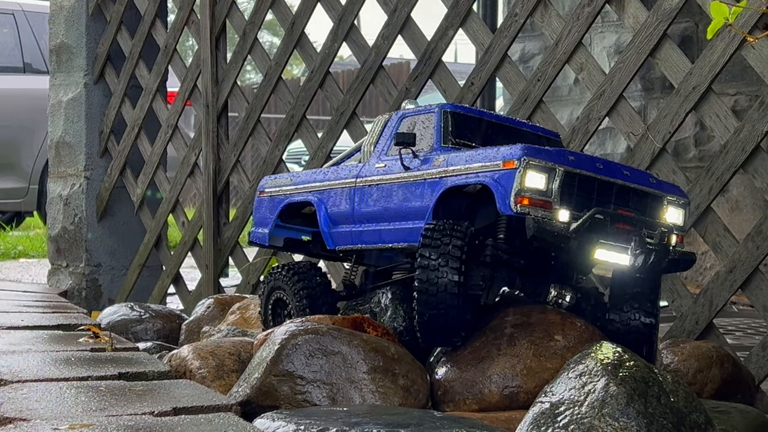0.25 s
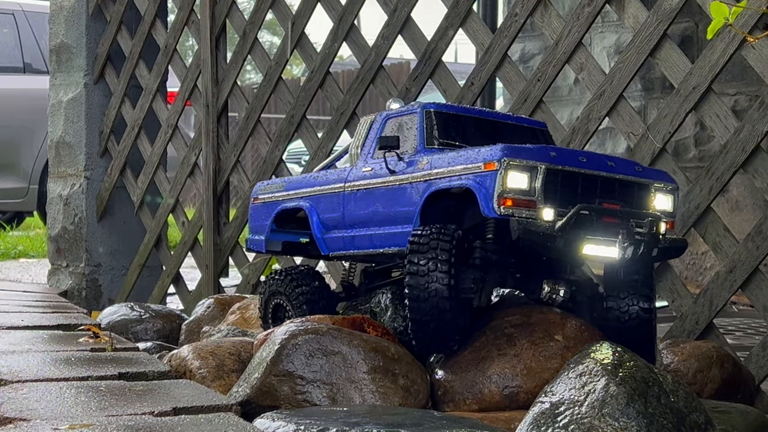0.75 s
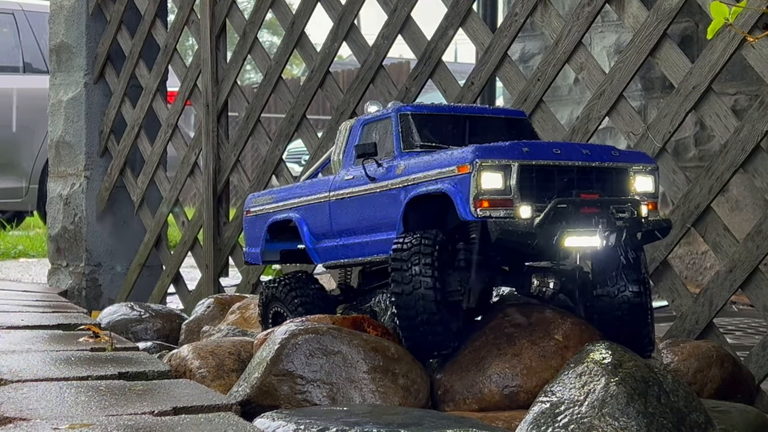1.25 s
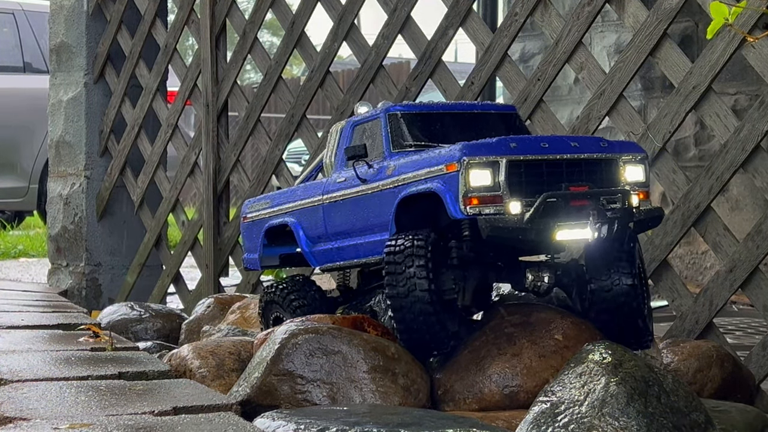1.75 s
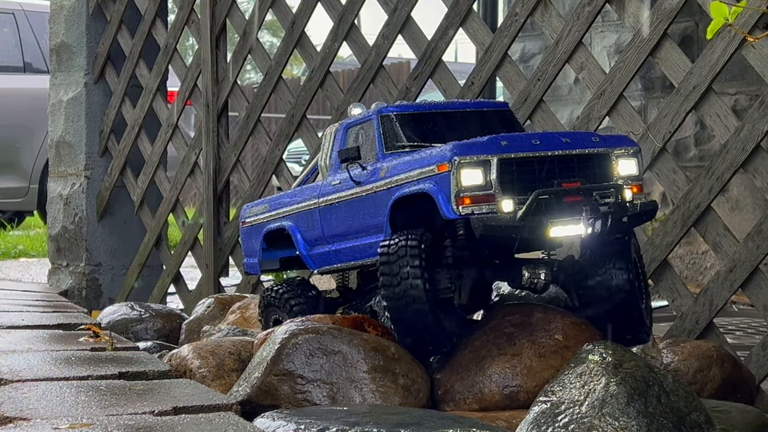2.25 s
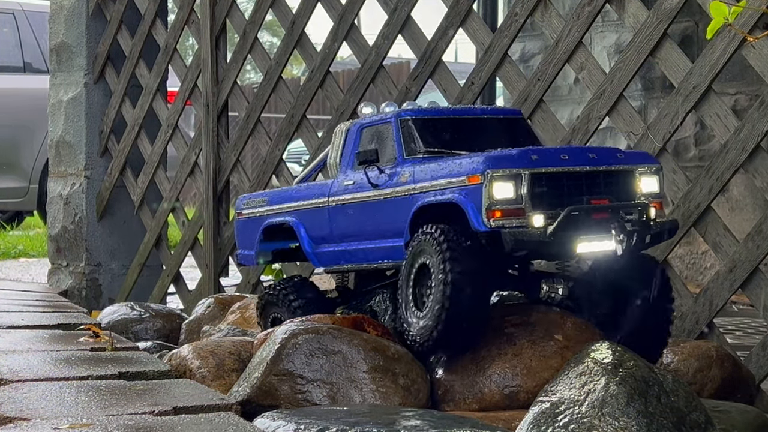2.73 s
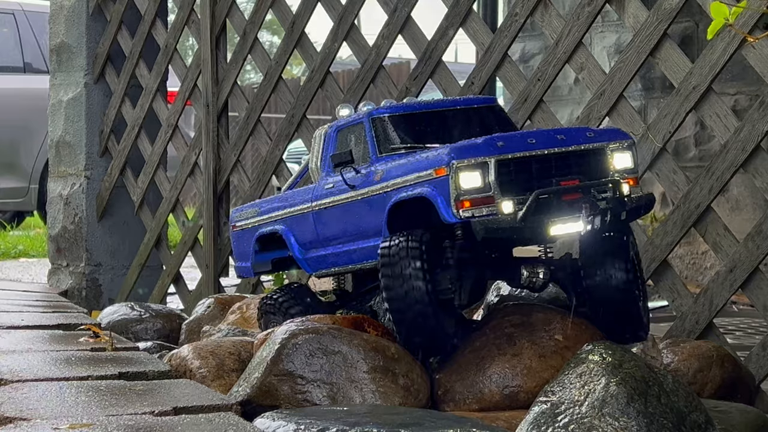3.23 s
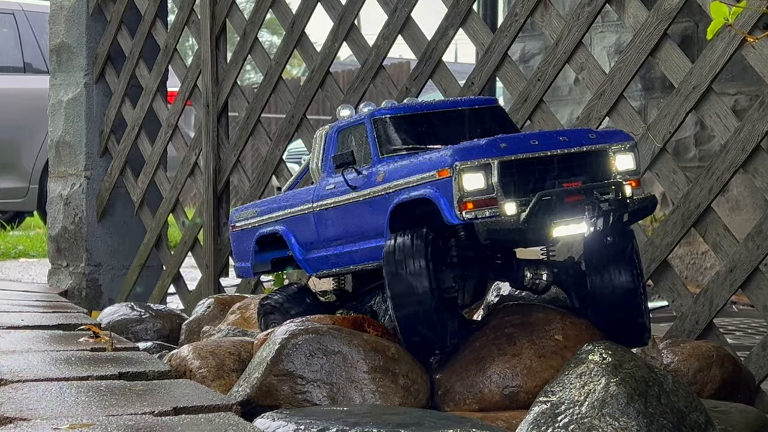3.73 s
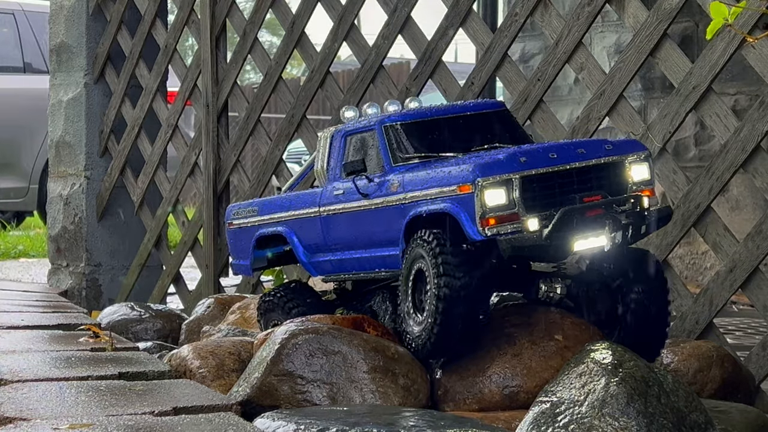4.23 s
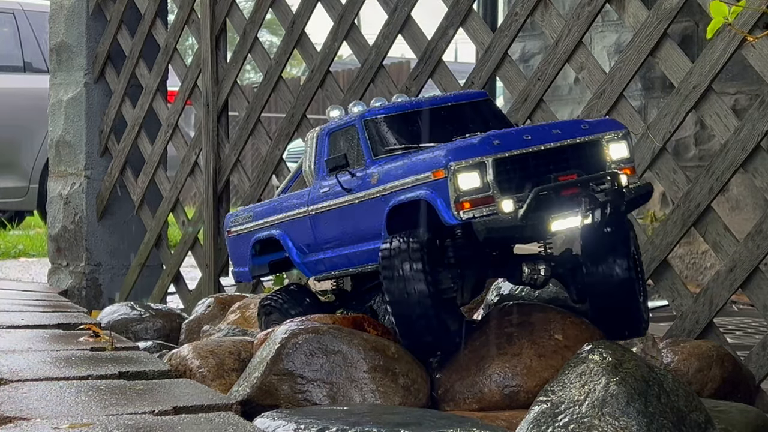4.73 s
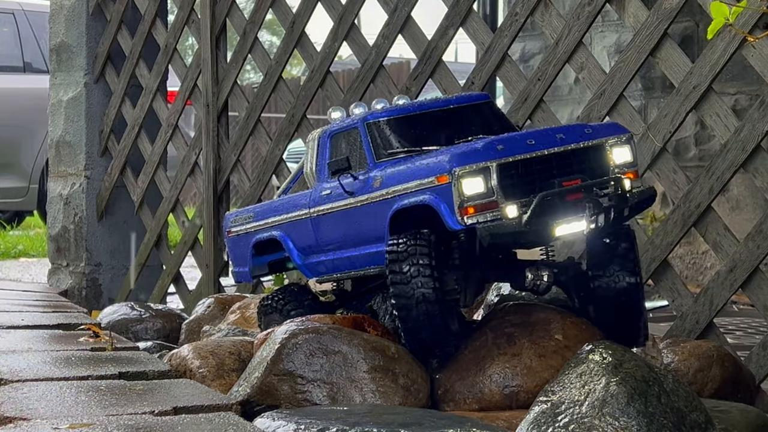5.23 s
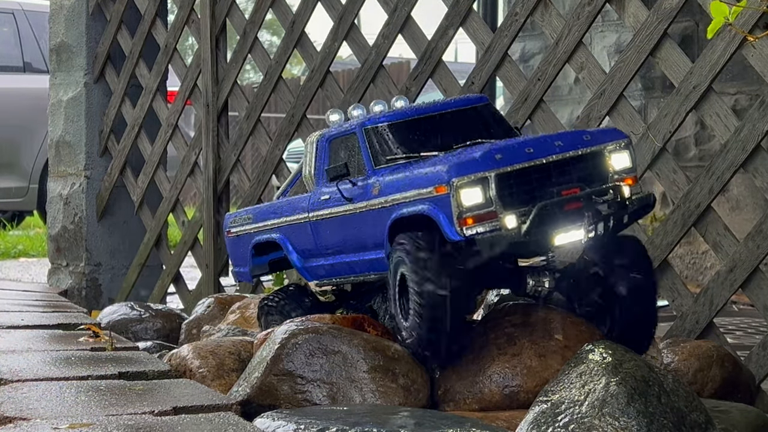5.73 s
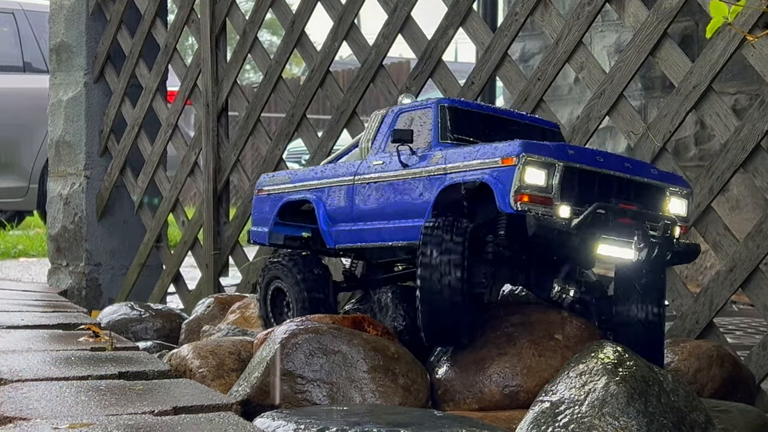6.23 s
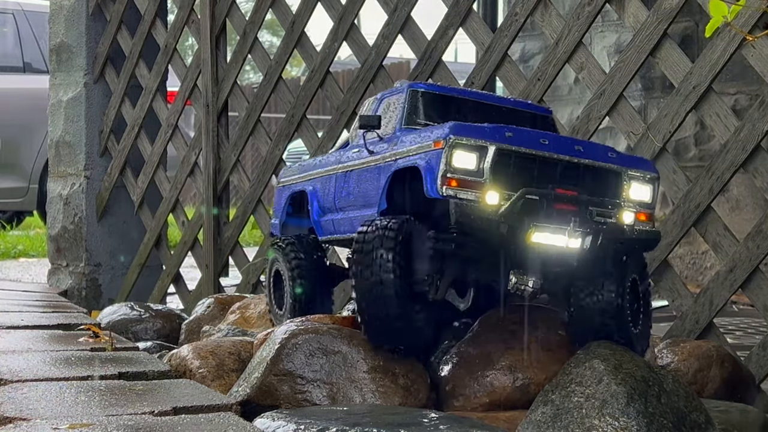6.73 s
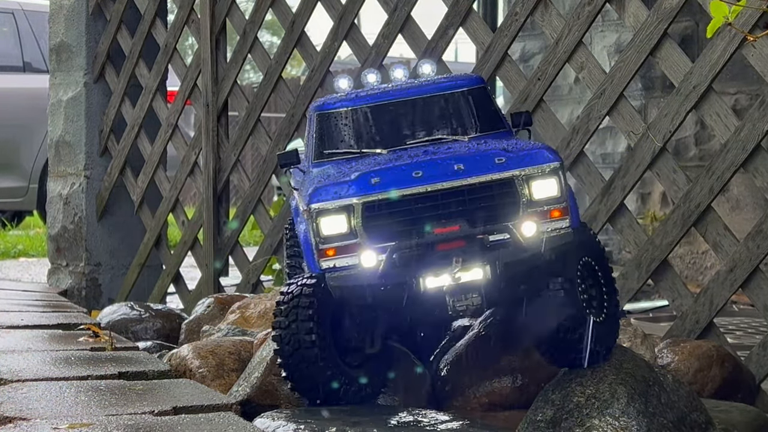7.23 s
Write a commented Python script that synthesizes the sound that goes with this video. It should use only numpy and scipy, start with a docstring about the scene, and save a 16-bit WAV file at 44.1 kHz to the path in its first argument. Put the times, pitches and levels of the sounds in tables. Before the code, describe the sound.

Outdoors in light rain, a short low rumble and a few plastic knocks and drop ticks come first. From about two seconds a small electric gear motor creeps up, then whines in four stronger bursts, raspy and fluttering, dipping between them. Tyres scrub and thump on stone; a hard clack lands near the end as the whine falls. Close microphone, dry yard with a brief reflection.

```python
"""Toy truck crawling over wet rocks

A small radio-controlled truck climbs stones in light rain. Its pinion whines, rasps and fizzes in bursts
of throttle: overtones and noise driven by the tooth rate, throbbing as the drive train binds and lets go.
Tyres and chassis knock as damped modes; shaped noise makes the rumble, drone, scrub, slips and rain.
Drops tick and clink nearby, a short low rumble opens the scene, and paving and fence answer briefly."""
import sys
import numpy as np
from scipy import signal
from scipy.fft import rfft, irfft, next_fast_len
from scipy.io import wavfile
from scipy.ndimage import map_coordinates

SR = 44100
rng = np.random.default_rng(int(sys.argv[2]) if len(sys.argv) > 2 else 0)


def put_to_file(sound):
    """Save the sound as 16-bit audio at rate SR, in the file named by the first command-line argument."""
    columns = np.atleast_2d(sound).T  # one column per channel
    safe = np.clip(columns, -1, 1)
    whole_steps = np.round(safe * 32767)
    wavfile.write(sys.argv[1], SR, whole_steps.astype(np.int16))


N = 329868

# resonances of gearbox and body shell: (f/Hz, width/Hz, level/dB)
HOUSING = [(1716, 220, -3), (2100, 220, -18), (3570, 170, -4.5), (3837, 75, 4), (4170, 60, 3.5),
           (4584, 210, 3), (5040, 57, -6.5), (5500, 210, 0.5)]
TEETH = 11  # on the pinion
FULL_SPEED_HZ = 1800  # tooth rate that counts as full speed
ROLL_ATTACK_S = 0.026  # time constant


def amp(db):
    """Decibels to gain."""
    return 10 ** (np.asarray(db) / 20)


def unit(x):
    """Scale to rms 1."""
    return x / np.sqrt(np.mean(x ** 2) + 1e-20)


def noise():
    """White noise as long as the scene."""
    return rng.standard_normal(N)


def along(points, hz):
    """(f/Hz, value) points read on a log frequency axis."""
    f, v = np.transpose(points)
    return np.interp(np.log(hz + 1), np.log(f + 1), v)


def curves(rows):
    """One value per sample for each column after the time."""
    s, *cols = np.transpose(rows)
    return [np.interp(np.arange(N) / SR, s, c) for c in cols]


def wobble(rate):
    """A smooth random curve, rate knots a second."""
    knots = rng.standard_normal(int(N * rate / SR) + 4)
    return map_coordinates(knots, [np.arange(N) * rate / SR])


def swell(start, length, attack_s, release_s):
    """An envelope that rises to 1 at start, holds and dies away."""
    t = np.arange(N) / SR - start
    rise = np.minimum(t, 0) / attack_s
    fall = np.maximum(t - length, 0) / release_s
    return np.exp(np.maximum(rise - fall, -20))


def filtered(x, response):
    """Shape x by a (possibly complex) response of frequency."""
    m = next_fast_len(N + SR // 2)
    return irfft(rfft(x, m) * response(np.fft.rfftfreq(m, 1 / SR)), m)[..., :N]


def coloured(x, spectrum):
    """Shape x by a spectrum of (f/Hz, level/dB), at rms 1."""
    return unit(filtered(x, lambda hz: amp(along(spectrum, hz))))


def narrow_noise(centre, half_width):
    """Noise in one narrow band; both settings in Hz."""
    return filtered(noise(), lambda hz: 1 / (1 + ((hz - centre) / half_width) ** 4))


def without_bass(x):
    """A body this small radiates no deep bass."""
    return signal.sosfilt(signal.butter(3, 100, "high", fs=SR, output="sos"), x)


def add(track, s, sound):
    """Mix a short sound into the track at time s."""
    start = int(np.clip(round(s * SR), 0, N - 1))
    track[start:start + len(sound)] += sound[:N - start]


def peak_one(x):
    """Scale to peak 1."""
    return x / np.abs(x).max()


def ring(t, hz, t60, attack):
    """A damped mode that starts at t = 0."""
    t = np.maximum(t, 0)
    return np.sin(2 * np.pi * hz * t) * amp(-60 * t / t60) * (1 - np.exp(-t / attack))


def rain():
    """Far rain is an even hiss; nearer drops stand out as tiny clicks."""
    # far hiss: (f/Hz, relative level/dB)
    hiss_spectrum = [(50, -70), (200, -24), (600, -52), (850, -35), (1100, -14), (2000, -9.5), (3800, -2),
                     (5500, -6.5), (7500, -2), (9000, -4.5), (10500, -2.5), (12500, -14.5), (16000, -12)]
    hiss = amp(-56.0 + 0.8 * wobble(2.8)) * coloured(noise(), hiss_spectrum)
    # about 90 drops a second, few of them loud
    drop_gain = amp(np.minimum(5 * noise(), 8))
    drops = (rng.random(N) < 90 / SR) * drop_gain
    click = rng.standard_normal(90) * np.exp(-np.arange(90) / 22)
    splashes = signal.fftconvolve(drops, click)[:N]
    drop_spectrum = [(150, -52), (500, -20), (2000, 3), (7000, 6.5), (15000, -4.0)]
    return hiss + amp(-63.5) * coloured(splashes, drop_spectrum)


def opening():
    """A steady low rumble with a little hiss, which stops short."""
    # (f/Hz, relative level/dB)
    rumble_spectrum = [(22, -41), (38, -0.5), (71, -0.5), (227, -9.5), (293, -14.5), (405, -16), (572, -20),
                       (756, -21), (1020, -27), (2870, -34), (4140, -45), (6500, -50), (8450, -73),
                       (14300, -120)]
    length_s, release_s = 0.508, 0.0093
    envelope = swell(0, length_s, ROLL_ATTACK_S, release_s)
    return amp(-40.5) * envelope * coloured(noise(), rumble_spectrum)


def yard(x):
    """Paving and fence answer with a short noise tail whose decay time varies with frequency."""
    # (f/Hz, t60/s)
    decay = [(150, 0.03), (1000, 0.07), (5000, 0.048), (14000, 0.072)]
    hz, t, z = signal.stft(rng.standard_normal(SR // 2), SR, nperseg=256)
    tail = signal.istft(z * amp(-60 * t / along(decay, hz)[:, None]), SR, nperseg=256)[1]
    answer = signal.fftconvolve(x, tail / np.linalg.norm(tail))[:N]
    fence_hz = 700  # the open lattice reflects little below this
    return filtered(answer, lambda hz: hz ** 2 / (hz ** 2 + fence_hz ** 2))


def speed():
    """Nominal tooth rate of the pinion in Hz, burst after burst."""
    # one short curve for each burst of throttle: (t/s, tooth rate/Hz)
    bursts = [
        [(1.95, 400.4), (2.27, 522), (2.45, 712), (2.56, 785), (2.66, 777), (2.75, 753), (2.8, 720),
         (2.92, 702), (3.02, 660)],
        [(3.11, 680), (3.15, 720), (3.205, 828), (3.285, 846), (3.345, 1021), (3.5, 1162), (3.565, 1670),
         (3.63, 1780), (3.815, 1825), (3.9, 1262), (4.08, 590)],
        [(4.26, 589.4), (4.342, 781), (4.428, 1009), (4.492, 1090), (4.55, 1284), (4.614, 1298), (4.66, 1455),
         (4.714, 1505), (4.745, 1665), (4.8, 1675), (4.835, 1755), (4.885, 1650), (4.91, 1720), (5.03, 1760),
         (5.08, 1860), (5.15, 1580), (5.225, 636), (5.33, 399)],
        [(5.44, 611), (5.515, 1399), (5.635, 1483), (5.665, 1584), (5.985, 1617), (6.07, 1041), (6.125, 963)],
        [(6.17, 1065), (6.26, 1678), (6.335, 1900), (6.555, 1835), (6.595, 1600), (6.62, 1422), (6.68, 1228),
         (6.78, 702), (6.95, 579), (7.3, 523)],
    ]
    return curves([point for burst in bursts for point in burst])[0]


def turning():
    """1 while the motor runs, 0 while it rests."""
    return np.interp(np.arange(N) / SR, [1.85, 2.02, 7.15, 7.35], [0, 1, 1, 0])


def ground_levels():
    """Rumble, drone and scrub in dB: a still floor, rolling that grows with speed, a swell for each stone."""
    # a tyre flexes and drags over a stone: (t/s, length/s, rumble/dB, drone/dB, scrub/dB)
    rolls = [(0.52, 0.075, -60, -84, -54), (1.205, 0.068, -84, -52, -60), (2.296, 0.18, -58.5, -87, -90),
             (2.53, 0.21, -64, -53.5, -52.5), (3.342, 0.052, -48, -54, -72), (3.694, 0.091, -56, -53, -79),
             (4.03, 0.33, -73, -61.5, -55.5), (4.906, 0.16, -71.5, -44.5, -73),
             (5.127, 0.24, -54, -42.5, -53.5), (5.523, 0.4, -48.5, -48, -48),
             (5.955, 0.18, -53, -49.5, -58), (6.656, 0.13, -59, -41.5, -42),
             (6.854, 0.36, -55.5, -49, -46.5)]
    # the yard with the truck at rest: (rumble/dB, drone/dB, scrub/dB)
    still_db = (-96, -102, -59.5)
    # steady rolling at full speed: (rumble/dB, drone/dB, scrub/dB)
    rolling_db = (-98, -62, -52)
    growth = 1.38  # rolling amplitude follows this power of the speed
    release_s = 0.067  # time constant
    rolling = turning() * (speed() / FULL_SPEED_HZ) ** growth
    power = amp(still_db)[:, None] ** 2 + np.outer(amp(rolling_db), rolling) ** 2
    for start, length, *levels_db in rolls:
        power += np.outer(amp(levels_db), swell(start, length, ROLL_ATTACK_S, release_s)) ** 2
    return 10 * np.log10(power)


def ground():
    """A low rumble, the drone of flexing tyres and the dull scrub of rubber on stone, all shaped noise."""
    # three spectra, each (f/Hz, relative level/dB)
    rumble_spectrum = [(20, -19), (35, -16), (55, 2.5), (85, 7.5), (110, 4.5), (200, -33), (800, -75)]
    drone_spectrum = [(30, -57), (70, -28), (105, -6), (135, 2), (170, -1.5), (215, -11.5), (400, -54.5),
                      (1500, -65)]
    scrub_spectrum = [(40, -75), (130, -19), (240, -1), (350, 0.5), (480, 0.5), (620, -7), (900, -9.5),
                      (1300, -7.5), (2500, -14.5), (6000, -37)]
    rumble_db, drone_db, scrub_db = ground_levels()
    rumble = amp(rumble_db - 3.5) * coloured(noise(), rumble_spectrum)
    drone = amp(drone_db - 4.5) * coloured(noise(), drone_spectrum)
    scrub = amp(scrub_db - 2.5 + 2.2 * wobble(40)) * coloured(noise(), scrub_spectrum)
    return rumble + drone + scrub


def ticks():
    """Drops and hard contacts snap: a few cycles of ringing with a short wet spray of noise."""
    # (t/s just ahead of the tick, peak level/dB before the bass cut, centre f/Hz)
    hits = [(0.3341, -25.5, 1850), (1.012, -22, 8240), (1.07, -23, 6900), (1.1972, -11, 5540),
            (1.053, -28.5, 2730), (1.3412, -25.5, 3080), (1.9435, -25, 5070), (2.0904, -37, 4900),
            (3.351, -41, 2170), (3.484, -39, 3530), (3.984, -23, 1770), (4.0815, -27.5, 1740),
            (5.3808, -20, 1740), (6.6199, -1, 1560), (6.755, -33, 1516)]
    crack_cycles, spray_s = 3, 0.0055  # the ring and the spray, each to -60 dB
    track, t = np.zeros(N), np.arange(SR // 20) / SR
    for s, db, hz in hits:
        spray = rng.standard_normal(len(t)) * amp(-60 * t / spray_s)
        snap = ring(t, hz, crack_cycles / hz, 1 / SR)
        crack = peak_one(snap) + amp(-6) * peak_one(spray)
        add(track, s + 0.001014, amp(db) * peak_one(crack))
    return without_bass(track)


def clink():
    """One drop strikes a hard part, whose damped modes ring briefly."""
    # (f/Hz, relative level/dB, t60/s)
    modes = [(2830, -3, 0.043), (4100, -2, 0.026), (5030, -1, 0.028), (11000, 5, 0.014)]
    t = np.arange(N) / SR - 1.9966
    ringing = sum(amp(db) * ring(t, hz, t60, 1 / SR) for hz, db, t60 in modes)
    return amp(-29) * peak_one(ringing)


def knocks():
    """A blow rings the plastic shell briefly, then the heavier chassis follows with a thud."""
    # tyres and chassis on stone: (t/s, relative level/dB, ring f/Hz, thud trim/dB, upper mode trim/dB)
    hits = [(0.237, -29, 870, -14, -1), (0.301, -27, 655, 2, 1), (0.324, -25.5, 876, -6, -3),
            (0.461, -25, 750, -3, 5), (1.073, -35, 606, -2, 4), (1.2015, -19, 720, -7.5, -6),
            (1.345, -37, 494, 2, 1), (2.4996, -27, 894, 11.5, -18), (5.382, -22, 733, -38, -3),
            (5.385, -27.5, 857, -30, -10), (5.478, -22.5, 986, -30, 12), (5.835, -24.5, 832, -19, -2),
            (5.865, -24.5, 1010, -4, -2), (5.94, -20, 1244, -15, -14), (6.214, -27, 1170, 4, -13),
            (6.547, -33.5, 803.3, 0, -8), (6.6207, -11, 1070, -4, 8), (6.6228, -5, 776, 4.5, -10),
            (6.63, -19, 910, -19, -17), (6.658, -37, 724, -2, -8), (6.905, -28.5, 910, 0, -4),
            (7.037, -37, 894, 6, -6), (7.261, -27, 1025, -11, 3.5), (7.452, -25.5, 785, -25, -4)]
    # plastic shell: (pitch ratio, relative level/dB, t60/s, attack/s)
    shell_modes = [(0.992, 2.5, 0.015, 0.0022), (0.66, -6, 0.028, 0.0045), (1.44, -7, 0.015, 0.0028),
                   (1.86, -3.5, 0.0069, 0.0011)]
    # chassis: (f/Hz, relative level/dB, t60/s)
    chassis_modes = [(121.7, -6, 0.13), (170.4, 6, 0.12), (210.6, 9.5, 0.08), (321, 17, 0.039),
                     (428, 15, 0.032)]
    track, t = np.zeros(N), np.arange(SR // 4) / SR
    # the thud starts 1.5 ms after the shell
    thud = sum(amp(level) * ring(t - .0015, f, t60, 0.0037) for f, level, t60 in chassis_modes)
    for s, db, hz, thud_db, hard_db in hits:
        shell = np.zeros(len(t))
        for ratio, level, t60, attack in shell_modes:
            # the hardness of the blow sets the upper modes only
            trim_db = hard_db if ratio > 1.2 else 0
            shell += amp(level + trim_db) * ring(t, ratio * hz, t60, attack)
        blow = peak_one(shell) + amp(thud_db - 6.0) * peak_one(thud)
        add(track, s, amp(db - 6.5) * blow)
    return without_bass(track)


def slips():
    """Tread on wet stone catches and lets go in quick succession: rough noise, each slip in its own band."""
    # (t/s, length/s, relative level/dB, centre f/Hz)
    scrapes = [(2.56, 0.12, -50.5, 3180), (2.722, 0.037, -52.5, 1710), (2.977, 0.05, -53, 2900),
               (5.092, 0.21, -51.5, 658), (5.269, 0.014, -51, 1441), (5.51, 0.42, -53.5, 619),
               (5.668, 0.24, -55, 1200), (6.693, 0.073, -70, 680)]
    width = 0.15  # half bandwidth as a share of the centre
    attack_s, release_s = 0.013, 0.016  # time constants
    track = np.zeros(N)
    for s, length, db, centre in scrapes:
        # the random level is the stick-slip flutter
        scrape = unit(narrow_noise(centre, width * centre) * amp(3 * wobble(120)))
        track += amp(db) * swell(s, length, attack_s, release_s) * scrape
    return track


def coasting():
    """Unloaded teeth chatter lightly and ring only the lowest resonance of the housing."""
    # gears freewheeling with the throttle off: (t/s, length/s, level/dB)
    spells = [(4.026, 0.25, -51.5), (6.8, 0.31, -53)]
    attack_s, release_s = 0.011, 0.013  # time constants
    fc, width, _ = HOUSING[0]
    envelope = sum(amp(db) * swell(s, length, attack_s, release_s) for s, length, db in spells)
    return envelope * unit(narrow_noise(fc, .5 * width))


def gear_levels(mesh_hz):
    """Whine, rasp, fizz and overtone clarity in dB, set by speed and load."""
    # how speed sets the gear sounds: (tooth rate f/Hz, whine/dB, rasp/dB, fizz/dB)
    by_speed = [(410, -59.5, -68.5, -84), (588, -46.5, -51.5, -79), (786, -53.5, -46, -58),
                (848, -42.5, -41.5, -61.5), (1120, -37.5, -41, -62), (1190, -43, -39, -60.5),
                (1440, -35.5, -37.5, -59), (1660, -31, -32.5, -47.5), (1676, -35.5, -35, -45)]
    # how hard the climb presses the teeth: (t/s, load/dB, extra mesh tone/dB, overtone clarity/dB)
    load = [(1.95, -16, 10, -8), (2.01, -12, 17, 0), (2.08, -14, 12, 0), (2.16, -31, 7, -2),
            (2.38, -16.5, 13.5, 1), (2.48, -9, -13, -4), (2.58, -1, -28, -14), (2.72, -6.5, -35, 6.5),
            (2.85, 0, -33, 4.5), (2.93, -3, -20, 0), (3.1, -3, -12, -9), (3.2, -3.5, -8, 6),
            (3.31, -1.5, -18, 3), (3.37, 0, 3, 0.5), (3.45, -2, 3, -1.5), (3.52, 1, -9, -3.5),
            (3.6, -0.5, -4, 4), (3.78, 0, 0, 6.5), (3.92, -0.5, 1.5, -5.5), (3.99, -2, -0.5, 3.5),
            (4.1, 2.5, -20, -5), (4.25, 0.5, -16, -5), (4.33, 0.5, -11, 2), (4.39, -0.5, -14, 4.5),
            (4.44, -0.5, -16, 1), (4.48, 1, 0, 0), (4.57, -1, -8, -0.5), (4.68, -1, 3.5, 1),
            (4.93, -1.5, 3.5, 4.5), (5.12, -1.5, 3.5, 7.5), (5.175, -1, 0.5, -2), (5.23, -1.5, 7, 7),
            (5.3, 2, 7, -1), (5.42, -9.5, 2, 7), (5.48, 0.5, -1, 1), (5.55, 0, 2, -1),
            (5.8, 0.5, -3.5, 5.5), (6.12, -3.5, -2, -2), (6.4, -3, 5.5, 4.5), (6.58, -2, -0.5, 2.5),
            (6.7, -2, -2, -0.5), (6.9, -3.5, -7, -6), (7.2, 0, -15, -24)]
    hz, *levels = np.transpose(by_speed)
    load_db, tone_db, clarity_db = curves(load)
    whine_db, rasp_db, fizz_db = [np.interp(mesh_hz, hz, level) + load_db for level in levels]
    return whine_db + tone_db, rasp_db, fizz_db, clarity_db


def binding():
    """Each bind drags the speed down and makes the teeth sing; in between they run slack and rattle."""
    # binds at full throttle: (t/s, length/s, mesh tone/dB, overtones/dB)
    binds = [(3.562, 0.072, 7.5, -1.5), (3.664, 0.039, 1, -1.5), (3.752, 0.036, -17, -5),
             (3.828, 0.059, -3.5, 2.5), (4.733, 0.078, -2.5, -0.5), (4.821, 0.046, 1.5, 1.5),
             (4.89, 0.087, 0.5, -1.5), (4.988, 0.068, 0.5, -1.5), (5.111, 0.039, -4.5, -5),
             (5.664, 0.036, -2.5, -1.5), (5.751, 0.035, -2, -8), (5.82, 0.05, 2, -6),
             (5.918, 0.026, -0.5, -5), (5.95, 0.038, 0.5, 1.5), (6.249, 0.066, 0, -2.5),
             (6.344, 0.036, -2, 0.5), (6.425, 0.038, 1, 0), (6.499, 0.039, 2.5, 0),
             (6.572, 0.027, -2.5, 1.5)]
    # speed lost over one bind: (tooth rate f/Hz, loss/Hz)
    sag_by_speed = [(1480, 0), (1600, 35), (1750, 85), (1880, 170)]
    # trims while the teeth rattle loose: (mesh tone/dB, overtones/dB, grit/dB)
    slack_db = (-9, -6.5, -2.5)
    bound_grit_db, edge_s = 1.8, 0.014  # rasp and fizz while bound; time to take hold or let go
    t, mesh_hz = np.arange(N) / SR, speed()
    fast = np.interp(mesh_hz, [1480, 1600], [0, 1])
    bound, levels_db, sag = np.zeros(N), np.zeros((3, N)), []
    for start, length, tone_db, overtones_db in binds:
        inside_s = np.minimum(t - start, start + length - t)
        grip = np.clip(inside_s / edge_s + .5, 0, 1)
        bound += grip
        levels_db += np.outer([tone_db, overtones_db, bound_grit_db], grip)
        # speed falls through the bind and recovers before the next
        sag += [(start, .5), (start + length, -.5)]
    slack = fast * np.clip(1 - bound, 0, 1)
    swing_hz = along(sag_by_speed, mesh_hz) * curves(sag)[0]
    return levels_db + np.outer(slack_db, slack), slack, swing_hz


def tooth_blows(mesh_hz, teeth):
    """No two teeth are alike: their blows repeat in a pattern, with backlash chatter on top."""
    at = np.flatnonzero(np.diff(np.floor(teeth)))
    tooth = np.arange(len(at)) % TEETH
    # columns: strength and timing
    flaws, chatter = rng.standard_normal((TEETH, 2)), rng.standard_normal((len(at), 2))
    size = unit(flaws[:, 0] - flaws[:, 0].mean())[tooth] + .55 * chatter[:, 0]
    late_periods = 0.074 * flaws[tooth, 1] + 0.059 * chatter[:, 1]
    late = late_periods * SR / mesh_hz[at]  # samples
    place = np.clip(np.round(at + late), 0, N - 1).astype(int)
    # blows crowd together at speed, so each is scaled down
    return unit(np.bincount(place, size / np.sqrt(mesh_hz[at]), N))


def whine(mesh_hz, teeth, whine_db, overtones_db, slack):
    """The mesh tone and its overtones: phase and level shake with speed, slack and low-speed cogging."""
    # how the gearbox radiates the tooth blows: (f/Hz, relative level/dB)
    gearbox = [(700, -12), (1080, 16), (1400, -9), (1700, 2.5), (2150, 9), (2450, 5.5), (2800, 10),
               (3350, 3.5), (4200, 3), (4800, 3), (5500, 1), (6500, -7.5), (9000, -6), (12000, -23)]
    slack_smear, cogging = 0.7, 0.42  # radians of shake when loose, and in slow overtones
    # an off-centre pinion runs early and late within each turn: sidebands a shaft speed apart
    turn = 2 * np.pi * teeth / TEETH
    runout = .2 * np.cos(turn) + .15 * np.cos(2 * turn + 1) + .09 * np.cos(3 * turn + 2)
    pace = mesh_hz / FULL_SPEED_HZ
    crawl = np.interp(mesh_hz, [750, 1300, 1600], [1, .8, 0])
    overtones, power = np.zeros(N), np.zeros(N)
    for k in range(2, 9):
        gain = amp(along(gearbox, k * mesh_hz) - 3.8 * np.log2(k))
        shake = k * (.08 * wobble(330) + .2 * wobble(70) + pace * runout)
        shake += (slack_smear * slack + cogging * crawl) * wobble(300)
        flutter = amp(2.2 * wobble(140) + 2.8 * wobble(35))
        overtones += gain * flutter * np.sin(2 * np.pi * k * teeth + shake)
        power += gain ** 2
    # a slow motor packs more overtones into the same resonances, so they share the power
    overtones *= amp(overtones_db) / np.sqrt(power)
    # the small housing radiates a low fundamental poorly
    radiation_db = np.interp(mesh_hz, [598, 870, 1060, 1290, 1670], [-5.5, -3, -4, -3.0, 2.0])
    flutter = amp(pace * (1.4 * wobble(220) + 1.4 * wobble(60)))
    shake = pace * (.25 * wobble(160) + runout) + slack_smear * slack * wobble(400)
    fundamental = amp(whine_db + radiation_db) * flutter * np.sin(2 * np.pi * teeth + shake)
    # the level beats twice a turn
    return (fundamental + overtones) * (1 + 0.19 * np.cos(2 * turn + 1))


def housing(hz):
    """Response of direct sound plus the ringing of the plastic housing."""
    modes = 0
    for fc, width, db in HOUSING:
        damping = 1j * hz * width
        modes = modes + amp(db) * damping / (fc ** 2 - hz ** 2 + damping)
    return amp(-1.5) * (1 + modes)


def gears():
    """Every tooth strikes the gearbox: a whine, a gritty rasp and a high fizz, all throbbing with the load."""
    # tooth rasp and brush fizz: (f/Hz, relative level/dB)
    rasp_spectrum = [(60, -82), (300, -33), (650, -8.5), (900, -16.5), (1200, -21), (1600, 0.5),
                     (2000, -0.5), (2450, 0), (3000, 3.5), (3600, -0.5), (5200, -4), (5800, -8), (6400, -8),
                     (12000, -18)]
    fizz_spectrum = [(300, -80), (3000, 8.5), (6000, 1), (7000, -2.5), (8400, 4.5), (9400, 12.5),
                     (10300, 5.5), (11000, 7.5), (11900, 4), (13000, -1.5), (14200, -2), (16000, -13)]
    # soft hiss of the motor creeping under load: (t/s, level/dB)
    creep_level = [(0, -92), (1.3, -91), (1.75, -67), (2.2, -59.5), (2.55, -51.5), (3.1, -55.5), (3.5, -68),
                   (7.48, -96)]
    # its colour: (f/Hz, relative level/dB)
    creep_spectrum = [(300, -80), (2800, -71), (4000, 7.5), (4800, 8.5), (6000, 0), (8000, -14),
                      (14000, -26)]
    mesh_hz = speed()
    whine_db, rasp_db, fizz_db, singing_db = gear_levels(mesh_hz)
    (tone_db, overtones_db, grit_db), slack, swing_hz = binding()
    jitter_hz = (8 * wobble(45) + 14 * wobble(300)) * (mesh_hz + 0) / FULL_SPEED_HZ
    mesh_hz = mesh_hz + swing_hz + jitter_hz
    teeth = np.cumsum(mesh_hz) / SR  # contacts so far
    # sliding flanks scrape once per contact, unevenly around each turn
    contact_db = 2.0 * np.cos(2 * np.pi * teeth) + 2 * np.cos(2 * np.pi * teeth / TEETH)
    contact = amp(contact_db + 1.9 * wobble(300))
    scrape = amp(5.5) * unit(contact * noise())
    rasp = coloured(scrape + tooth_blows(mesh_hz, teeth), rasp_spectrum)
    fizz = coloured(contact * noise(), fizz_spectrum)
    grit = amp(rasp_db - 4.0 + 1.3 * wobble(70)) * rasp + amp(fizz_db + 10) * fizz
    # overtones follow the rasp level
    tones = whine(mesh_hz, teeth, whine_db + tone_db, rasp_db + singing_db + overtones_db, slack)
    drive = tones + amp(grit_db) * grit
    creep = amp(curves(creep_level)[0]) * coloured(noise(), creep_spectrum)
    return filtered(turning() * drive, housing) + creep


def scene():
    """Everything lies straight ahead; the two microphone ports differ mainly in phase."""
    # path difference between the ports: (f/Hz, phase by which left leads/rad)
    ports = [(100,-.3),(800,-.6),(1300,-.3),(2000,0),(3400,.6),(4800,.5),(5800,-.35),(6500,0),(7400,0),(8600,-1.2),(9200,-2.5),(9800,-3.1),(10300,-3.2),(10800,-3.55),(12800,-6.2),(14000,-6.3),(15800,-9)]
    truck = gears() + coasting() + slips() + knocks()
    snaps = ticks() + clink()
    answer = yard(amp(-5.0) * truck + amp(-15) * snaps)
    direct = truck + snaps + answer + ground() + opening() + rain()
    pair = filtered(direct, lambda hz: np.exp(1j * np.outer([.5, -.5], along(ports, hz))))
    # a further yard answer, opposite in left and right, widens the image
    return pair + amp(-18.0) * yard(direct) * np.array([[1], [-1]])


def record(dry):
    """The microphones pass nothing above their band limit."""
    top_hz = 15900
    return filtered(dry, lambda hz: hz < top_hz)


dry = scene()
out = record(dry)
put_to_file(out)
```